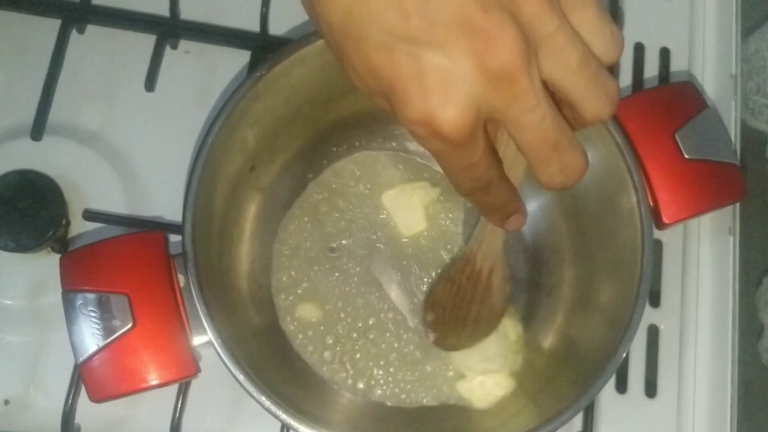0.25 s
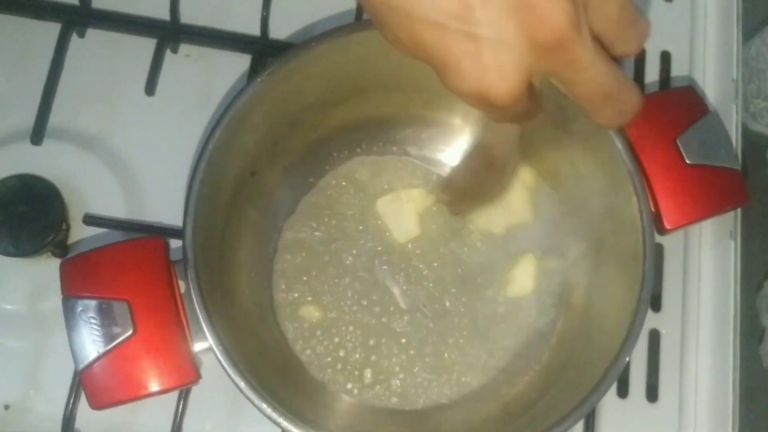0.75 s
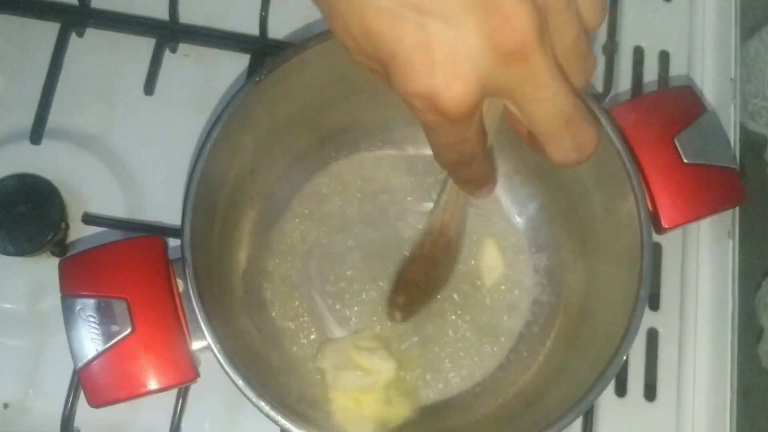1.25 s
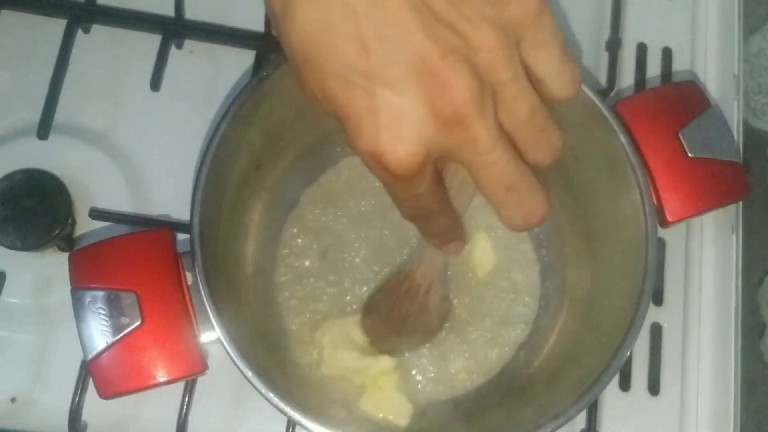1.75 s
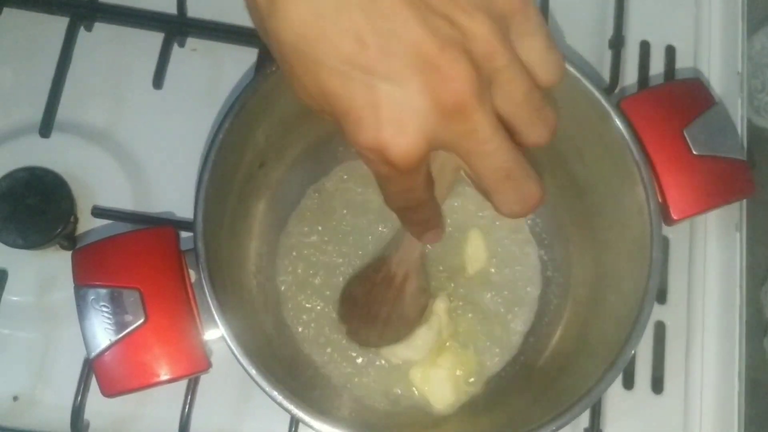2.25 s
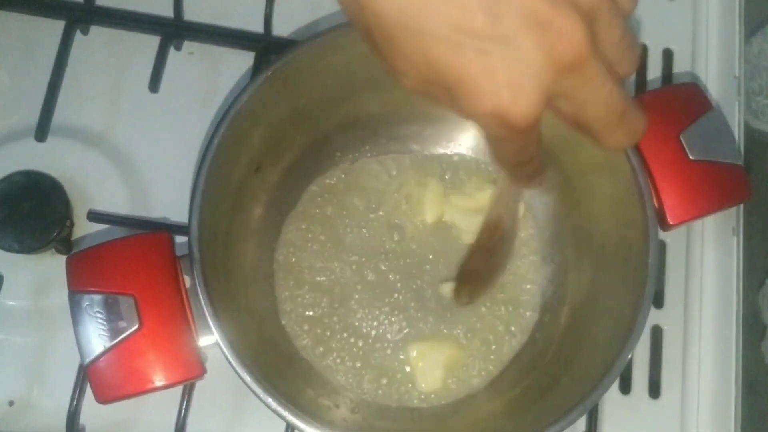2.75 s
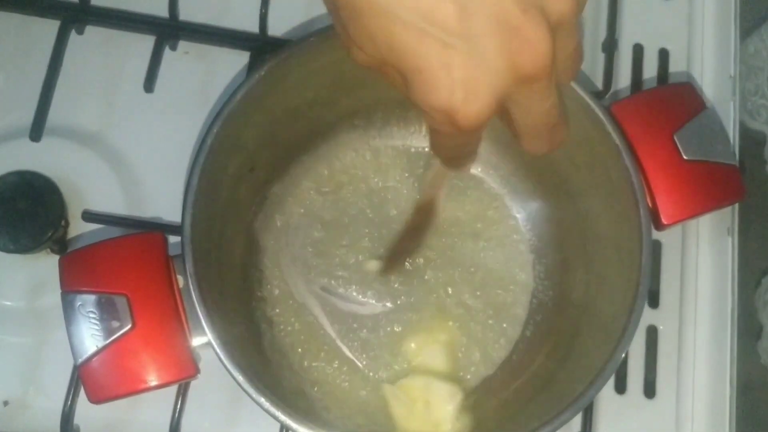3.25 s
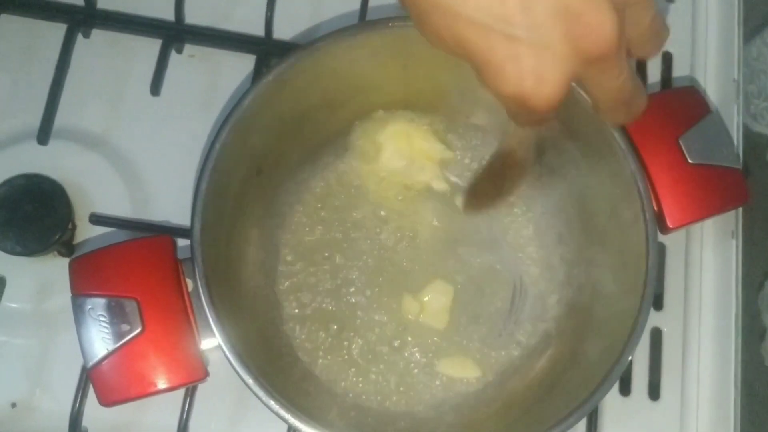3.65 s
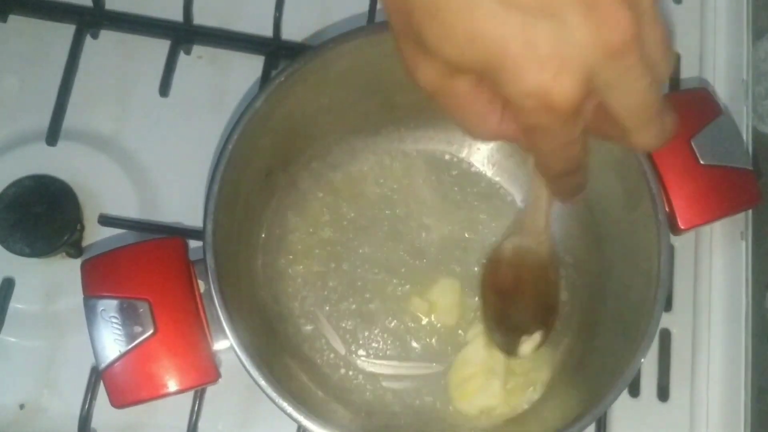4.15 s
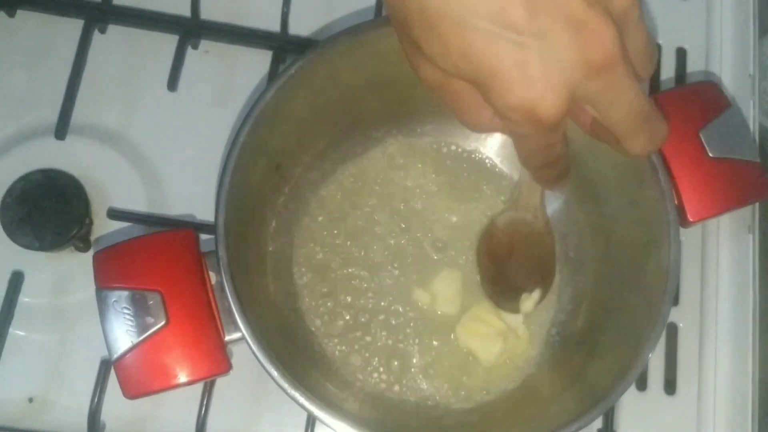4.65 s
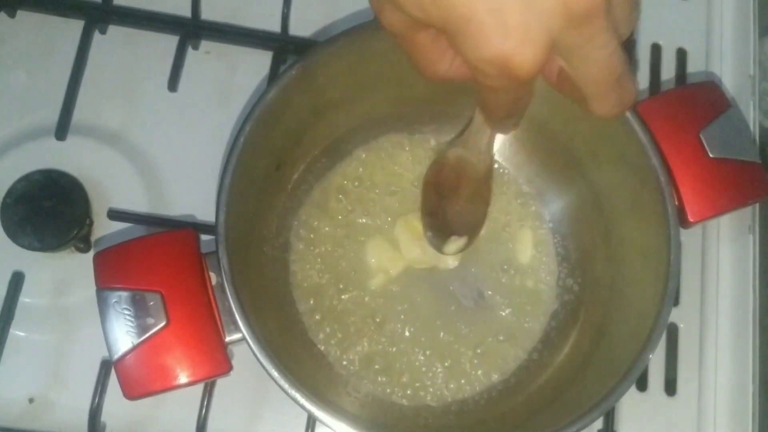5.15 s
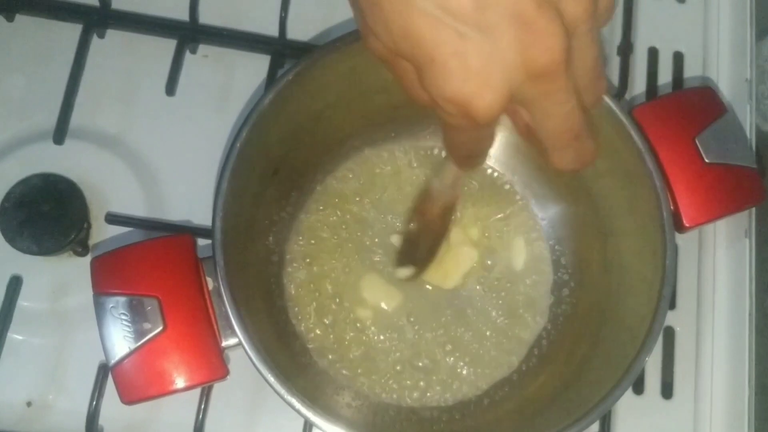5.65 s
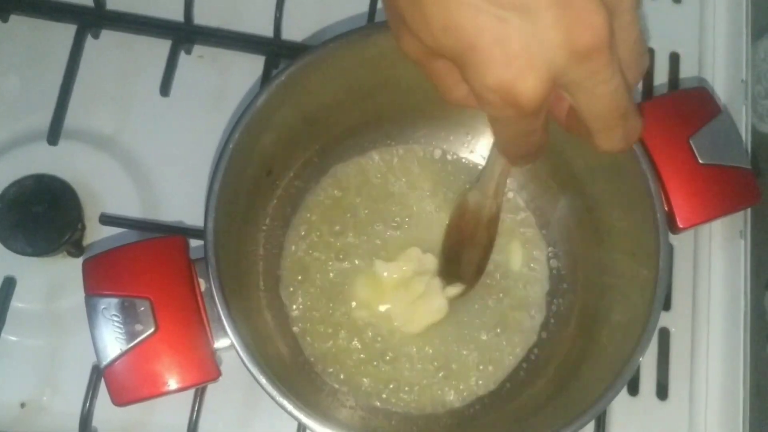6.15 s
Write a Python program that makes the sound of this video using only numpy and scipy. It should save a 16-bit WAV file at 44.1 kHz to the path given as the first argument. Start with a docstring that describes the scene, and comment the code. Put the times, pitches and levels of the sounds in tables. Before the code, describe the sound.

Close, bright sizzling of melting butter, with sharp spits, foam pops and a few dull wooden spoon knocks against a steel pot.

```python
"""Butter fizzes and foams in a steel pot over a rumbling gas flame, as a wooden spoon rubs the pot floor.
Soon drops spit and the flame thumps low, then bubbles blip, wet butter flares up and foam pops.
From about 2 s the spoon also knocks the pot, which shudders briefly; just after 3 s a deep wobble swings up.
Boiling is made of random ringing bursts, knocks of dying sines, and flame and rubbing of filtered noise.
The pot's air rings with the frying; two small microphone ports then colour the whole sound."""
import sys
import numpy as np
from scipy import signal
from scipy.fft import rfft, irfft
from scipy.io import wavfile

SR = 44100
rng = np.random.default_rng(int(sys.argv[2]) if len(sys.argv) > 2 else 0)


def log_audio(samples):
    """Write samples as a 16-bit WAV file to the path given in sys.argv[1]."""
    # one column per channel
    frames = np.atleast_2d(samples).T
    # limit to full scale, then quantise
    limited = np.clip(frames, -1, 1)
    pcm = np.round(limited * 32767).astype(np.int16)
    wavfile.write(sys.argv[1], SR, pcm)


N = 283122
TIME = np.arange(N) / SR


def from_db(db):
    """Turn decibels into gain."""
    return 10 ** (np.asarray(db) / 20)


def left_right(db):
    """Gains for both sides; the left ends up this many dB above the right."""
    return from_db(np.array([[.5], [-.5]]) * db)


def rms_one(x):
    """Scale to an rms (average strength) of 1."""
    return x / np.sqrt(np.mean(x ** 2) + 1e-20)


def random_signs(count):
    """Push or pull, by chance."""
    return rng.choice([-1, 1], count)


def smooth(x, lag_s):
    """Follow x with a lag."""
    keep = np.exp(-1 / (lag_s * SR))
    return signal.lfilter([1 - keep], [1, -keep], x)


def filtered(x, order, hz, kind):
    """Keep only the part of x that lies in a range of pitches."""
    return signal.sosfilt(signal.butter(order, hz, kind, fs=SR, output="sos"), x)


def drift(rate):
    """Slow random wandering with a spread of 1; rate in Hz."""
    # one value for every 40 samples, joined by straight lines
    r = np.exp(-80 * np.pi * rate / SR)
    noise = rng.standard_normal(N // 40 + 2002)
    slow = signal.lfilter([1], [1, -2 * r, r * r], noise)[2000:]
    return np.interp(np.arange(N) / 40, np.arange(len(slow)), rms_one(slow))


def colour(x, spectrum, size=2048):
    """Filter sound to follow a spectrum, with the least possible delay (minimum phase)."""
    hz, db = np.transpose(spectrum)
    grid = np.maximum(np.fft.rfftfreq(size, 1 / SR), 1)
    gain = from_db(np.interp(np.log(grid), np.log(hz), db))
    cepstrum = irfft(np.log(gain))
    # folding the cepstrum forward in time makes the filter causal
    cepstrum[1:size // 2] *= 2
    cepstrum[size // 2 + 1:] = 0
    response = irfft(np.exp(rfft(cepstrum)))
    return signal.fftconvolve(x, response[None], axes=1)[:, :N]


def peak(hz, width, db):
    """Filter coefficients of one resonant peak or dip."""
    w, g = 2 * np.pi * min(hz, SR / 2 - 1) / SR, from_db(db / 2)
    k = np.tan(np.pi * width / SR)
    return [1 + k * g, -2 * np.cos(w), 1 - k * g], [1 + k / g, -2 * np.cos(w), 1 - k / g]


def resonate(x, peaks):
    """Pass sound through a chain of resonant peaks and dips."""
    for hz, width, db in peaks:
        x = signal.lfilter(*peak(hz, width, db), x)
    return x


def swell(s, length):
    """A smooth bump of height 1, mostly between s and s + length."""
    return np.exp(-(2 * (TIME - s) / length - 1) ** 4)


def surge(s, rise_s, fade_db_per_s):
    """Rise from s to height 1, then die away."""
    rise = np.clip((TIME - s) / rise_s, 0, 1)
    return rise * from_db(-fade_db_per_s * np.maximum(TIME - s - rise_s, 0))


def bursts(per_s, scatter_db, low_hz, high_hz, cycles, bounce_db, bounce_s, count=16):
    """Random bursts ring a few cycles at one of count pitches, with a puff of wall reflections; rms 1."""
    born = rng.random(N) < per_s / SR
    sizes = born * from_db(scatter_db * np.minimum(rng.exponential(1, N), 5.5)) * random_signs(N)
    dealt, out = rng.integers(0, count, N), 0
    for k, hz in enumerate(np.linspace(low_hz, min(high_hz, .4 * SR), count)):
        clicks = sizes * (dealt == k)
        # the left side gets each click 4 to 6 samples later
        direct = np.array([np.roll(clicks, k % 3 + 4), clicks])
        energy = smooth(clicks ** 2 + 1e-18, bounce_s)
        puff = from_db(bounce_db) * np.sqrt(energy) * rng.standard_normal((2, N))
        r = np.exp(-hz / (cycles * SR))
        ringing = [1, -2 * r * np.cos(2 * np.pi * hz / SR), r * r]
        out = out + signal.lfilter(np.sqrt(1 - r) * np.array([1, 0, -1]), ringing, direct + puff)
    return rms_one(out)


SIMMER_DB, SIMMER_FADE_DB_PER_S = -35, 0.77   # butter left alone, slowly losing its water
# the spoon spreads wet butter over hot steel; the fizz swells, then fades as the water boils off:
# [t/s, rise/s, level/dB, fade/dB per s]
SPREADS = [(0.14, 0.19, -30, 8.5), (0.5, 0.3, -28.5, 17), (1.05, 0.1, -29.5, 12.5), (2.64, 0.036, -30, 43),
           (2.87, 0.056, -31, 8.5), (3.5, 0.024, -27.5, 12)]


def boiling():
    """Quiet simmer level, and how far freshly spread butter lifts the fizz above it; both in dB."""
    simmer_db = SIMMER_DB - SIMMER_FADE_DB_PER_S * TIME
    fresh = sum((from_db(db - simmer_db) * surge(s, rise_s, fade)) ** 2 for s, rise_s, db, fade in SPREADS)
    return simmer_db, 10 * np.log10(1 + fresh)


# the foam takes a share of each swell, a little later
FOAM_LEVEL_DB, FOAM_FOLLOWS, FOAM_LAG_S, FOAM_FADE_DB_PER_S = -32.5, 0.26, 0.16, 0.5958
CRACKLE_DB, BUBBLES_DB = -8.5, -9   # dry pops and ringing bubbles, relative to the foam
TICK_DB, TICK_FOLLOWS = -41.5, 0.53   # small drops follow each swell less, so stand out as the fizz calms
# tone of the fine bursts leaving the fat: [f/Hz, relative level/dB]
FIZZ_TONE = [(1000, -15), (3000, -27), (5500, -3.5), (7500, -0.5), (9500, 2), (11000, 0), (12500, -2.5),
             (14300, -7.5)]
# tone of the foam and its bubbles: [f/Hz, relative level/dB]
FOAM_TONE = [(300, -21), (1000, -21), (1650, -17.5), (2400, -11), (3500, -2.5), (4800, 1.5), (6000, 4),
             (7500, -4.5), (10000, -24.5), (14300, -6)]
# slow drift of the fizz between left and right: [t/s, left minus right level/dB]
FIZZ_SIDE = [(0, 2.5), (0.8, 1.5), (1.7, -1.5), (2.8, 0.5), (4.2, 1.5), (5.5, 0)]


def sizzle():
    """Water bursts out of hot fat as fine fizz and ticks, and out of foam as bubbles and crackle."""
    simmer_db, lift_db = boiling()
    foam_db = FOAM_LEVEL_DB - FOAM_FADE_DB_PER_S * TIME + FOAM_FOLLOWS * smooth(lift_db, FOAM_LAG_S)

    fine = bursts(per_s=6000, scatter_db=2.9, low_hz=4380, high_hz=14040, cycles=1.4,
                  bounce_db=1.0, bounce_s=0.002)
    clumps_db = 0.85 * drift(rate=30)   # bursts come in clumps
    heat = from_db(simmer_db + lift_db + clumps_db)
    side = left_right(np.interp(TIME, *np.transpose(FIZZ_SIDE)))
    fizz = heat * side * rms_one(colour(fine, FIZZ_TONE))

    ticks = bursts(per_s=260, scatter_db=0.5, low_hz=7400, high_hz=9800, cycles=2.2,
                   bounce_db=-6.5, bounce_s=0.00088, count=8)
    ticking = from_db(TICK_DB - SIMMER_FADE_DB_PER_S * TIME + TICK_FOLLOWS * lift_db) * ticks

    coarse = bursts(per_s=7400, scatter_db=5.0, low_hz=1220, high_hz=10400, cycles=2.1,
                    bounce_db=8, bounce_s=0.013)
    foam = from_db(foam_db + 0.35 * drift(rate=6.7)) * rms_one(colour(coarse, FOAM_TONE))

    snaps = bursts(per_s=260, scatter_db=3.5, low_hz=3150, high_hz=7200, cycles=0.92,
                   bounce_db=-0.5, bounce_s=0.0012)
    crackle = from_db(foam_db + CRACKLE_DB) * rms_one(colour(snaps, POP_TONE))

    rings = bursts(per_s=320, scatter_db=2.0, low_hz=2094, high_hz=7174, cycles=11,
                   bounce_db=-4, bounce_s=0.004, count=24)
    bubbles = from_db(foam_db + BUBBLES_DB) * rms_one(colour(rings, FOAM_TONE))
    return fizz + ticking + foam + crackle + bubbles


# resonances of the air in the pot: [f/Hz, width/Hz, level/dB]
CAVITY = [(594, 100, 23.5), (1333, 51, 7.5), (1715, 96, 3.5), (2027, 150, 6), (2660, 170, 5),
          (3067, 120, -6)]


def pot_air(x, wander, rate, size=512):
    """The pot's air rings at pitches that wander slowly by chance, stepped block by block."""
    x = x.copy()
    for hz, width, db in CAVITY:
        pitch, state = hz * np.exp(wander * drift(rate)), np.zeros((2, 2))
        for i in range(0, N, size):
            block = x[:, i:i + size]
            x[:, i:i + size], state = signal.lfilter(*peak(pitch[i], width, db), block, zi=state)
    return x


# tone of the gas flame: [f/Hz, relative level/dB]
FLAME_TONE = [(20, 3), (45, 0), (80, -6), (115, -6), (148, -9.5), (200, -6.5), (300, -13), (560, -14),
              (800, -18.5), (1500, -26), (4000, -59)]
# resonances of the burner under the pot: [f/Hz, width/Hz, level/dB]
BURNER = [(94.5, 39, 6), (145.7, 6.9, 16), (174.3, 7.8, 3.5), (443, 1.5, 13)]


def flame(level_db, flutter_db):
    """Burning gas roars as lumpy, low-pitched noise, alike on both sides in the bass."""
    mid, side = rng.standard_normal((2, N))
    side = filtered(side, 1, 1100, "high")
    air = mid + side * [[1], [-1]]
    roar = rms_one(resonate(colour(air, FLAME_TONE), BURNER))
    return from_db(level_db + flutter_db * drift(rate=7.4)) * roar


GRAZE_DB, LIFT_S = -2, 0.0028   # force of the graze before a blow; time to touch down or lift off


def skid(s, before_s, after_s):
    """The spoon grazes the steel just before a blow, drags on after it and lifts off."""
    grip = np.clip(np.minimum(TIME - s + before_s, s + after_s - TIME) / LIFT_S, 0, 1)
    return grip * np.where(TIME < s, from_db(GRAZE_DB), 1)


def skidding():
    """Dragging force of the spoon around all its blows."""
    return sum(from_db(db + skid_db) * skid(s, before_s, after_s)
               for s, db, _, skid_db, before_s, after_s in KNOCKS)


# firm rounds of the spoon over the pot floor: [middle t/s, half length/s, level/dB]
STIRS = [(0.94, 0.89, -53.5), (3.2, 1, -57.5), (3.624, 0.51, -53.5)]
# tone of wood dragged over buttered steel: [f/Hz, relative level/dB]
RUB_TONE = [(140, -34), (210, 12.5), (320, 1), (460, 1), (680, -1), (950, -0.5), (1200, -12), (1420, 0),
            (1650, -26), (2000, -1.5), (3000, -14)]


def rubbing(skid_db, slips_per_s):
    """Dragged wood moves in tiny slips, heard as the spoon sweeps the floor and as it skids."""
    sweeps = sum(from_db(db) * np.exp(-((TIME - s) / half_s) ** 2) for s, half_s, db in STIRS)
    force = from_db(skid_db) * skidding() + sweeps
    slips = (rng.random(N) < slips_per_s / SR) * random_signs(N)
    return force * rms_one(colour(np.array([slips, slips]), RUB_TONE))


def echoes(x, t60, wet_db, delay):
    """Add dense reflections that die by 60 dB in t60 seconds, different on each side."""
    t = TIME[:SR // 2]
    tail = rng.standard_normal((2, len(t))) * from_db(-60 * t / t60) * (t > delay)
    tail /= np.sqrt(np.sum(tail ** 2, axis=1, keepdims=True))
    return x + from_db(wet_db) * signal.fftconvolve(x, tail, axes=1)[:, :N]


SPIT_HZ, SPIT_SPREAD = 8600, 0.056   # pitch of a spit, and its relative scatter
# the biggest drops spit: [t/s, level/dB, left minus right level/dB]
SPITS = [(0.254, -22, 13), (0.309, -17, 2), (0.372, -23, 6), (0.424, -25, 0), (0.558, -15, -1),
         (0.678, -22, -2), (0.7495, -23, 0), (0.7795, -17, 3), (0.864, -28, 5), (1.046, -26, 0),
         (1.088, -18, -2), (1.242, -18, 2), (1.722, -17.5, -2), (1.983, -21, 1), (2.231, -26, 0),
         (2.307, -21.5, -7), (2.457, -22, 0), (2.732, -18, 0), (2.853, -20, -7), (2.886, -14.5, -7),
         (2.961, -27, 1), (3.072, -18, 1), (3.085, -18, -2), (3.242, -13.5, -1), (3.676, -14, 4),
         (3.7992, -15, 2), (3.836, -11.5, -3), (3.934, -15, -2), (4.017, -18, -2), (4.348, -26, 2),
         (4.871, -24, -7), (5.012, -20.5, 0), (5.062, -16, -2), (5.071, -19, 0), (5.218, -21, -4),
         (5.245, -16, -5), (5.305, -25.5, -5), (5.38, -16, -2), (5.506, -21.5, -8), (5.594, -23, -2),
         (5.619, -21, 3), (5.672, -16, 3), (5.71, -25, -2), (5.785, -22, 3), (5.922, -43, 0),
         (6.140, -27, 3), (6.215, -21.5, 1), (6.274, -27, 2), (6.2965, -21, -2), (6.341, -23, 0),
         (6.356, -19.5, -8), (6.367, -25, 9)]


def spits(snap_s, bounce_db, bounce_s):
    """A drop bursts in a snap a few cycles long, then bounces around the pot by paths of its own."""
    out, t = np.zeros((2, N)), TIME[:SR // 50]
    for s, db, pan_db in SPITS:
        hz = SPIT_HZ * (1 + SPIT_SPREAD * rng.standard_normal())
        shape = (t / snap_s * np.exp(1 - t / snap_s)) ** 2
        snap = shape * np.sin(2 * np.pi * hz * t)
        paths = rng.standard_normal((2, len(t))) * np.exp(-t / bounce_s)
        paths *= from_db(bounce_db) / np.linalg.norm(paths[0])
        paths[:, 0] = 1   # the direct sound
        heard = signal.fftconvolve(paths, snap[None], axes=1)[:, :len(t)]
        at = int(s * SR)
        out[:, at:at + len(t)] += (from_db(db) * left_right(pan_db) * heard)[:, :N - at]
    return out


# low thumps of the flame near 65 Hz, then brief shudders of the pot above 200 Hz:
# [t/s, length/s, f/Hz, level/dB]
THUMPS_AND_SHUDDERS = [(0.33, 0.097, 64.7, -37.5), (0.96, 0.064, 66, -41.5), (1.712, 0.1, 64.8, -38),
                       (2.933, 0.037, 241, -42.5), (3.2, 0.028, 262, -51), (3.646, 0.035, 287.5, -43),
                       (3.73, 0.025, 227, -45), (3.89, 0.028, 205, -35), (5.852, 0.02, 305.4, -42)]


def thumps_and_shudders():
    """The flame thumps and the pot vibrates, each as a brief sine of unsteady pitch."""
    unsteady = 0.19 * np.cumsum(drift(rate=38)) / SR   # the pitch wanders
    return sum(from_db(db) * swell(s, length) * np.sin(2 * np.pi * hz * (TIME + unsteady))
               for s, length, hz, db in THUMPS_AND_SHUDDERS)


# the largest bubbles open with a short blip: [t/s, f/Hz, level/dB]
BLIPS = [(0.705, 2690, -36), (1.123, 5750, -19), (1.465, 6050, -20), (1.522, 2350, -32), (3.213, 2560, -32),
         (3.591, 4600, -24), (6.024, 6060, -24.5)]


def blips(rise_s, glide):
    """A larger bubble tears open with a soft snap and rings for a few milliseconds, rising in pitch."""
    out, t = np.zeros((2, N)), TIME[:SR // 25]
    for s, hz, db in BLIPS:
        phase = 2 * np.pi * hz * t * (1 + glide * t) + rng.uniform(0, np.pi, (2, 1))
        tone = t / rise_s * np.exp(1 - t / rise_s) * np.sin(phase)
        hiss = rng.standard_normal((2, len(t))) * np.exp(-t / 0.00082)
        snap = filtered(hiss, 1, [.7 * hz, 1.4 * hz], "band")
        at = int(s * SR)
        out[:, at:at + len(t)] += from_db(db) * (tone + snap)
    return out


# short rushes of wet butter, and one very brief bright spit at 3.048 s: [t/s, length/s, level/dB]
FLARES = [(0.72, 0.032, -24), (0.745, 0.013, -29), (0.765, 0.045, -34), (0.793, 0.016, -24.5),
          (0.865, 0.011, -26.5), (1.99, 0.038, -34), (2.922, 0.047, -31.5), (3.048, 0.0023, -17),
          (3.318, 0.06, -33), (3.533, 0.013, -22.5), (3.548, 0.12, -34), (3.738, 0.027, -43),
          (4.856, 0.052, -39), (5.128, 0.039, -36)]
# tone of these rushes and of that spit: [f/Hz, relative level/dB]
FLARE_TONE = [(3000, -17), (6500, -8.5), (8500, 4.5), (10500, 2), (12500, -3), (14300, -7)]


def flares():
    """Wet butter boils in short rushes of very small, sharp bursts; the briefest is a single bright spit."""
    rush = bursts(per_s=3700, scatter_db=1.5, low_hz=8100, high_hz=14100, cycles=1.8,
                  bounce_db=3, bounce_s=0.0021, count=6)
    strength = sum(from_db(db) * swell(s, length) for s, length, db in FLARES)
    return strength * rms_one(colour(rush, FLARE_TONE))


# bubbles in the foam pop: [t/s, level/dB before the tone below, left minus right level/dB]
POPS = [(1.34, -13, 4), (1.6, -15, 0), (1.822, -20, 16), (2.958, -15, -10), (3.349, -15.5, -1),
        (3.835, -13, -3), (4.323, -15, 5), (4.458, -18, -1), (4.912, -17, -3), (4.973, -19, -12),
        (4.9792, -12.5, 2), (5.281, -12.5, 10), (5.322, -13.5, 3), (5.895, -19, -2), (6.196, -15.5, -3),
        (6.251, -13.5, 0)]
# tone of a pop's crack: [f/Hz, level/dB]
POP_TONE = [(500, -51), (2000, -32.5), (3200, -11.5), (5000, -7.5), (6500, 4.5), (8200, -15), (14000, -23)]


def pops(decay_s, bounce_db, bounce_s):
    """A foam bubble snaps open in a dry, broad crack, with a faint tail from the pot's walls."""
    out, t = np.zeros((2, N + SR)), TIME[:SR // 25]
    shape = np.exp(-t / decay_s) + from_db(bounce_db) * np.exp(-t / bounce_s)
    for s, db, pan_db in POPS:
        at = int(s * SR)
        crack = shape * rng.standard_normal((2, len(t)))
        out[:, at:at + len(t)] += from_db(db) * left_right(pan_db) * crack
    return colour(out[:, :N], POP_TONE)


def ring(clicks, hz, t60):
    """A unit click sets off a sine that starts near height 1 and dies by 60 dB in t60 seconds."""
    r, w = from_db(-60 / (t60 * SR)), 2 * np.pi * hz / SR
    return signal.lfilter([0, np.sin(w)], [1, -2 * r * np.cos(w), r * r], clicks + 1e-18)


MODE_SCATTER_DB = 1.5   # chance spread of each ringing tone from blow to blow
# spoon against the pot: [t/s, blow level/dB, brightness/dB against the other blows,
# skid level/dB relative to the blow, skid before/s, skid after/s]
KNOCKS = [(1.9358, -28.5, -16, -22, 0.012, 0.023), (1.9635, -44, -10, -25, .002, .004),
          (2.257, -35.5, -20, -16.5, 0.0086, 0.02), (2.939, -34.5, -31, -18, 0.0045, 0.024),
          (3.1145, -39.5, -33, -21, 0.0026, .01), (3.1885, -33, -33, -18, .01, 0.011),
          (3.6389, -28.5, -23, -19, 0.022, 0.032), (3.8742, -28, -14, -18.5, 0.013, 0.035),
          (5.8505, -29.5, -17.5, -24, 0.0033, 0.029), (5.8586, -45, -30, -27, .002, .008)]
# tones that a knock rings with: [f/Hz, relative level/dB, time to fall 60 dB/s]
POT_MODES = [(203, -35, 0.14), (450, -41, 0.17), (507, 0.5, 0.014), (604, -17, 0.088), (680, -22.5, 0.07),
             (764, -25, 0.14), (900, -18, 0.0044), (1166, -15, 0.06), (1308, -10.5, 0.15),
             (1405, -11, 0.14), (1486, -25, 0.1), (1710, -19, 0.06), (1920, -10, 0.03)]


def spoon(level_db, hardness, chatter_db, chatters_per_s):
    """Wooden blows amid tiny contacts ring the pot; brighter blows reach its higher modes."""
    s, db, bright_db = np.transpose(KNOCKS)[:3]
    at, out = (s * SR).astype(int), np.zeros(N)
    contacts = (rng.random(N) < chatters_per_s / SR) * random_signs(N)
    chatter = from_db(chatter_db) * skidding() * contacts
    soft_db = hardness * np.interp(TIME, s, bright_db - bright_db.max())   # per octave above 550 Hz
    for hz, mode_db, t60 in POT_MODES:
        clicks = chatter.copy()
        clicks[at] = from_db(db + rng.normal(0, MODE_SCATTER_DB, len(at)))
        octaves = max(np.log2(hz / 550), 0)
        out -= ring(clicks * from_db(level_db + mode_db + soft_db * octaves), hz, t60)
    out = filtered(out, 2, 170, "high")
    return np.array([out, out])


WOBBLE_HZ, WOBBLE_DB = 13.5, -23.5
WOBBLE_START_S, WOBBLE_RISE_S, WOBBLE_FADE_DB_PER_S = 3.015, 0.024, 18.5


def wobble(rumble_db, rumble_fade_db_per_s, waver_db):
    """A slow, uneven swing below hearing, with a faint rumble that outlasts it."""
    rumble = rms_one(filtered(rng.standard_normal(N), 2, [28, 55], "band"))
    height = from_db(WOBBLE_DB + waver_db * drift(rate=3.2))
    swing = height * np.sin(2 * np.pi * WOBBLE_HZ * (TIME - WOBBLE_START_S))
    return (swing * surge(WOBBLE_START_S, WOBBLE_RISE_S, WOBBLE_FADE_DB_PER_S)
            + from_db(rumble_db) * rumble * surge(WOBBLE_START_S, WOBBLE_RISE_S, rumble_fade_db_per_s))


def scene():
    """Frying heard through the pot's air, with the spoon and the flame."""
    drops = spits(snap_s=0.00024, bounce_db=-2.5, bounce_s=0.0016) + blips(rise_s=0.0012, glide=0.6)
    butter = sizzle() + drops + flares() + pops(decay_s=0.0012, bounce_db=-9.5, bounce_s=0.017)
    frying = pot_air(butter, wander=0.015, rate=2.9)
    knocks = spoon(level_db=4.0, hardness=0.8, chatter_db=4, chatters_per_s=730)
    bare = rubbing(skid_db=-4, slips_per_s=900) + thumps_and_shudders() + knocks
    echoing = echoes(bare, t60=0.026, wet_db=-47, delay=0.0035)
    burner = flame(level_db=-47.0, flutter_db=2.37)
    return frying + echoing + burner + wobble(rumble_db=-48.5, rumble_fade_db_per_s=6.5, waver_db=2.6)


CUTOFF_HZ = 14400
# resonances of the two microphone ports: [f/Hz, width/Hz, level/dB]
LEFT_PORT = [(1354, 19, 9.5), (3170, 470, 4), (8850, 960, 8.5), (10270, 1340, 5), (12750, 6260, 8)]
RIGHT_PORT = [(1457, 47, 7.5), (4240, 4300, -1), (8516, 1720, 19.5), (13400, 1000, 5)]


def record(dry):
    """Each port adds its own resonances; the tallest peaks are rounded and the top is cut steeply."""
    heard = np.array([resonate(dry[0], LEFT_PORT), resonate(dry[1], RIGHT_PORT)])
    heard = heard / (1 + (heard / .68) ** 4) ** .25
    return signal.sosfilt(signal.ellip(12, .2, 80, CUTOFF_HZ, fs=SR, output="sos"), heard)


dry = scene()
out = record(dry)
log_audio(out)
```